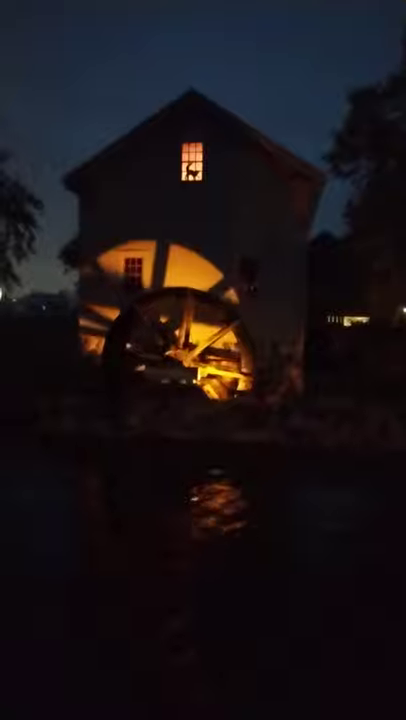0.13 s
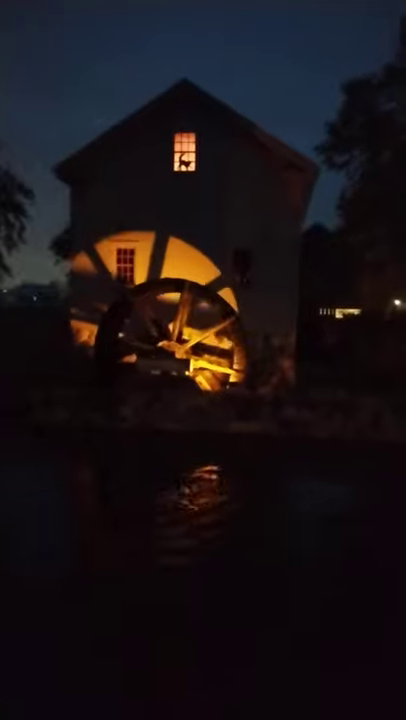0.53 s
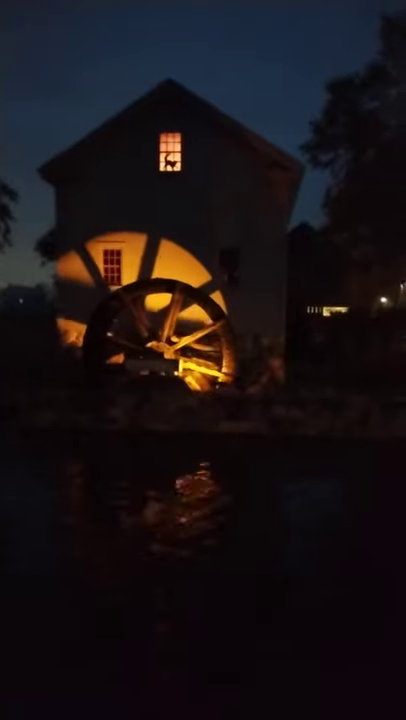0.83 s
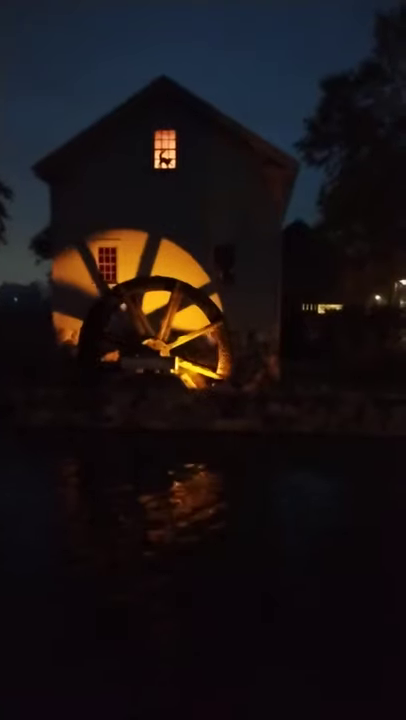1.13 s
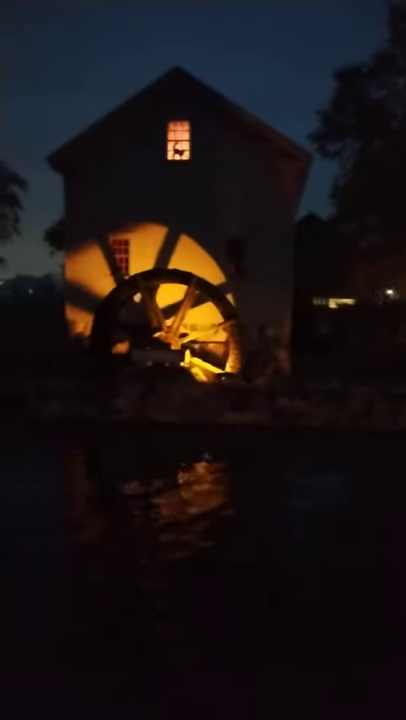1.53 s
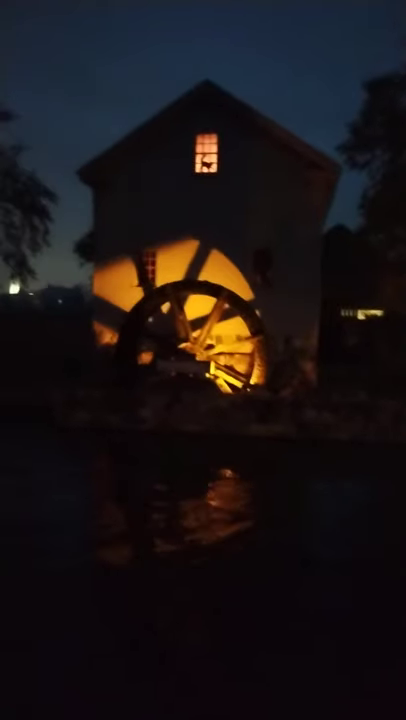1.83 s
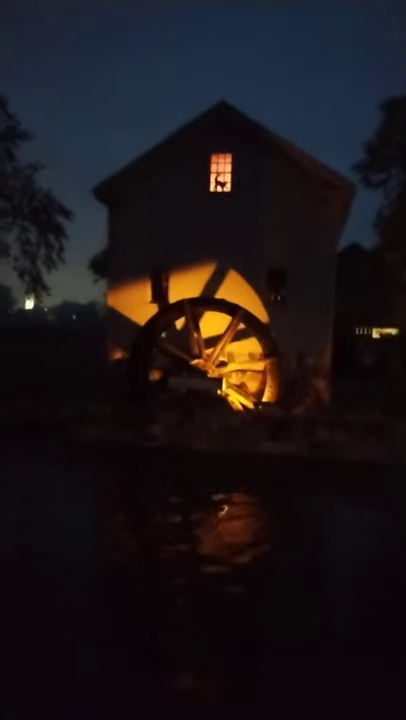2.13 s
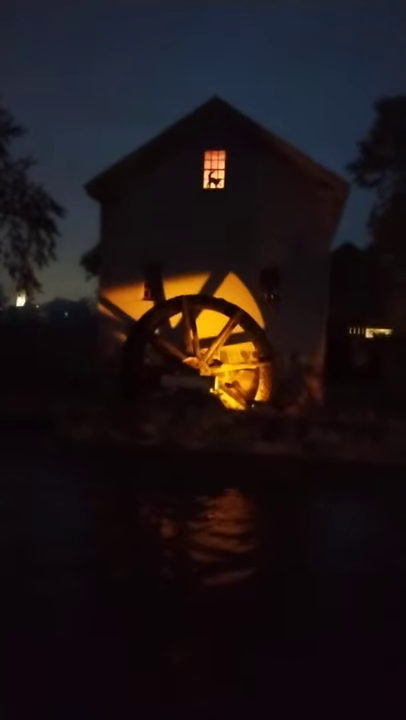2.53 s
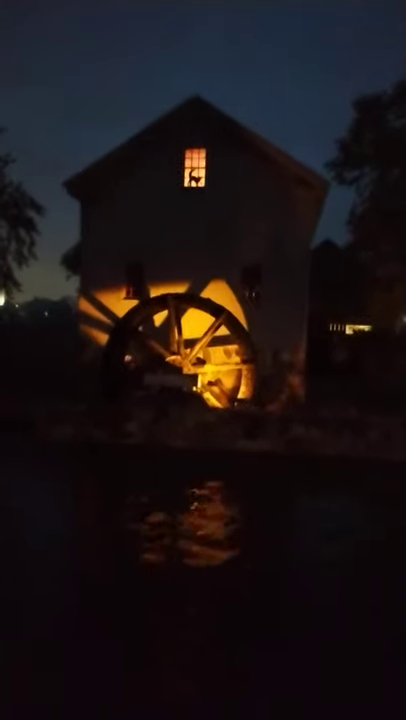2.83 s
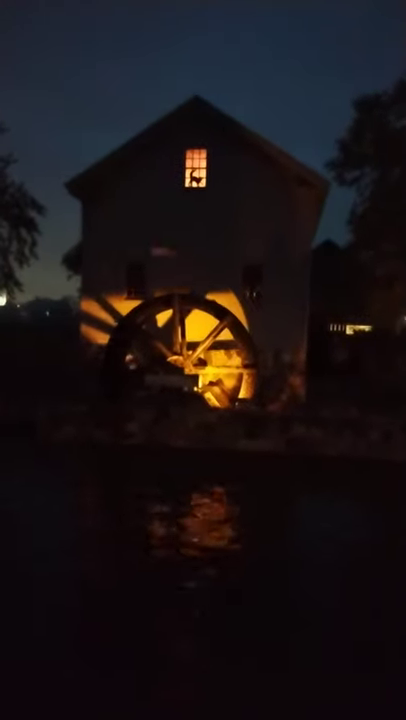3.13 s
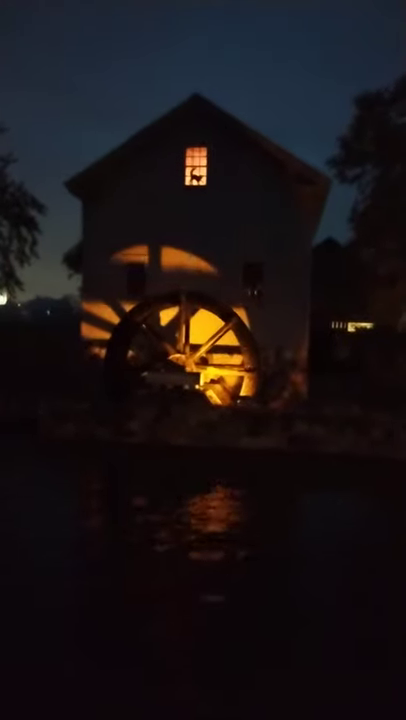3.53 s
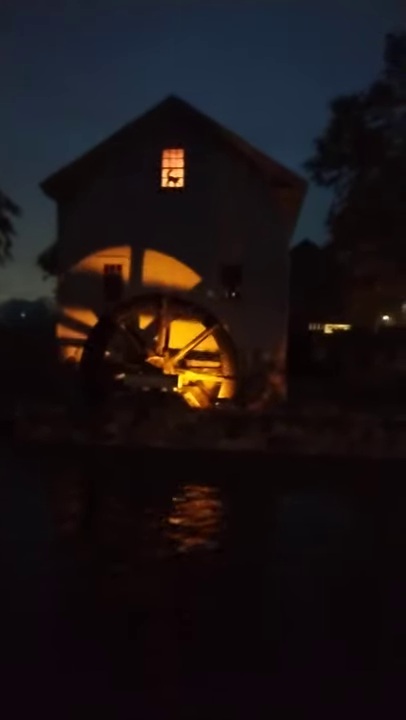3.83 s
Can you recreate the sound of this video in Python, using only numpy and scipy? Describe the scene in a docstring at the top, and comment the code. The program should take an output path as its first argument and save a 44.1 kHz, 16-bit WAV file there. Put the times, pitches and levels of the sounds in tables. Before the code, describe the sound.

A wide rush of falling water fades in quickly, churning and hissing over a mill wheel across a pond. It booms and thumps in the wheel pit, then grows softer and thinner, with one small splash.

```python
"""Across a mill pond at night: water pours over a wheel and a weir.
Churning water, crowds of small bubbles and spray make one broad rush. Falling water booms
in the wheel pit, heavy gushes thump in it, and one small splash stands out.
The sound fades in after a moment of silence; the rush grows softer and thinner half way through."""
import sys
import numpy as np
from scipy import signal
from scipy.fft import rfft, irfft
from scipy.io import wavfile
from scipy.ndimage import uniform_filter1d

SR = 44100
rng = np.random.default_rng(int(sys.argv[2]) if len(sys.argv) > 2 else 0)


def wrap_up_sound(samples):
    """Save the sound to the file named by the first command line argument, as 16-bit audio."""
    columns = np.atleast_2d(samples).T
    # keep every value between -1 and 1, then stretch to whole-number steps
    tamed = np.clip(columns, -1, 1)
    steps = np.round(tamed * 32767).astype(np.int16)
    wavfile.write(sys.argv[1], SR, steps)


N = 176400
TIME_S, FREQ_HZ = np.arange(N) / SR, np.fft.rfftfreq(N, 1 / SR)
START_S = 0.242


def undb(db):
    """Decibels to gain."""
    return 10 ** (np.asarray(db) / 20)


def unit(x):
    """Scale to rms 1."""
    return x / np.sqrt(np.mean(x ** 2))


def over_time(points):
    """Join (s, value) points by straight lines."""
    return np.interp(TIME_S, *np.array(points).T)


def over_pitch(points):
    """Join (Hz, value) points on a log-frequency axis."""
    hz, value = np.array(points).T
    return np.interp(np.log(FREQ_HZ + 1), np.log(hz + 1), value)


def wander(per_s):
    """Smooth random motion, rms 1."""
    hold = int(SR / per_s)
    steps = np.repeat(rng.standard_normal(N)[:N // hold + 1], hold)
    return unit(uniform_filter1d(uniform_filter1d(steps, hold), hold)[:N])


def resonant_noise(shape, hz, width_hz):
    """Noise around one peak, rms 1."""
    peak = 1 / (1 + ((FREQ_HZ - hz) / width_hz) ** 2) ** 2
    return unit(irfft(rfft(rng.standard_normal(shape)) * peak, N))


def drops(per_s=3000, spread_db=2, tail_s=0.0011):
    """Spray lands as dense ticks of uneven size, each with a short fizz."""
    lands = rng.random(N) < per_s / SR
    size_db = spread_db * np.minimum(rng.exponential(size=N), 2 * np.pi)
    ticks = lands * undb(size_db)
    fizz_power = signal.lfilter([1], [1, -np.exp(-2 / (tail_s * SR))], ticks ** 2)
    return unit(np.sqrt(fizz_power) * rng.standard_normal(N))


def bubbles(per_s=1100, low_hz=220.6, high_hz=3170, cycles=23, glide=0.1, spread_db=9.5):
    """Trapped air rings briefly, rising in pitch."""
    out = np.zeros(N + SR)
    for when, pitch, size in rng.random((int(per_s * N / SR), 3)):
        hz = low_hz + (high_hz - low_hz) * pitch ** 2
        age = np.linspace(0, 1, int(SR * cycles / hz))
        phase = 2 * np.pi * cycles * age * (1 + glide * age / 2)
        ring = np.sin(phase) * undb(-40 * age)
        onset = int(when * N)
        out[onset:onset + len(age)] += ring * np.sqrt(hz * pitch) * undb(spread_db * size ** 3)
    band_share = 2 * (high_hz - low_hz) / SR  # gives about the power per Hz of unit white noise
    return unit(out[:N]) * np.sqrt(band_share)


def water():
    """Spectrum of one stretch of falling water: churn, spray and bubbles."""
    churn = rng.standard_normal(N)
    return rfft(churn + undb(-5) * drops() + undb(-5) * bubbles())


# Likeness of left and right. Each row: frequency in Hz, coherence from 0 to 1.
COHERENCE = [(60, 0.991), (200, 0.979), (430, 0.926), (640, 0.704), (950, 0.762), (1400, 0.622),
             (1700, 0.619), (2100, 0.349), (3200, 0.524), (4300, 0.532), (6500, 0.351), (9000, 0.392),
             (11000, 0.291), (12800, 0.043), (15000, 0.044)]
# Balance. Each row: frequency in Hz, left over right in dB.
BALANCE_DB = [(60, 0.0), (200, 0.4), (400, 1.5), (600, 2.3), (850, -2.8), (1100, -0.9), (1400, 3.5),
              (1750, 1.3), (2400, -1.3), (3200, 2.8), (4400, 2.4), (5800, 7.0), (7000, 8.6), (8300, 12.4),
              (9600, 10.7), (11000, 4.6), (12000, 1.0), (14000, 4.5), (15500, 4.2)]
# Phase between the sides. Each row: frequency in Hz, lead of the left in radians.
LEAD_RAD = [(60, 0.11), (430, 0.28), (690, -0.08), (1210, 1.07), (1720, 0.3), (2400, 1.72), (3200, 2.55),
            (4400, 3.23), (6000, 3.59), (7300, 4.44), (9700, 4.35), (11500, 4.86), (14000, 2.53),
            (15500, 3.32)]


def wide_water():
    """Two stretches of water reach left and right; the bass is shared, the hiss leans left."""
    alike, lead_rad = over_pitch(COHERENCE), over_pitch(LEAD_RAD)
    lean = undb(over_pitch(BALANCE_DB) / 2)
    shared = water() * np.sqrt(1 + alike)
    apart = water() * np.sqrt(1 - alike)
    left = (shared + apart) * lean
    right = (shared - apart) / lean * np.exp(-1j * lead_rad)
    centre_gain = np.sqrt(lean ** 2 + lean ** -2 + 2 * alike * np.cos(lead_rad))
    return np.array([left, right]) / centre_gain


# Colour of the full and the soft rush. Each row: frequency in Hz, relative level within a band in dB.
FULL_COLOUR_DB = [(15, -57), (25, -40), (56, -9), (102, -1), (119, -1.5), (152, -3), (222, -5), (275, -8.5),
                  (402, -8), (602, -13.5), (788, -12), (951, -14.5), (1390, -15.5), (2950, -30),
                  (3380, -38), (3860, -35.5), (4190, -40), (5060, -38.5), (6280, -30.5), (8000, -24),
                  (8680, -24), (9660, -27), (11400, -42), (14100, -38.5), (15700, -41)]
SOFT_COLOUR_DB = [(15, -69), (25, -37), (30, -52), (42, -17), (86, -7.5), (123, -6), (137, -0.5),
                  (156, -11.5), (184, -3), (216, -10), (275, -9), (485, -15), (540, -14.5), (670, -15.5),
                  (1350, -19.5), (2020, -25), (2190, -29), (2650, -32.5), (3380, -38.5), (3970, -38),
                  (6630, -32), (8000, -24.5), (9160, -24.5), (12300, -37.5), (15700, -35)]
# Envelopes of the six bands, low to high. Each row: time in seconds, level before trim in dB.
BASS_DB = [(0.33, -45), (0.5, -38), (0.72, -38), (0.95, -36), (1.05, -37), (1.5, -37), (1.8, -35.5),
           (2.1, -36.5), (2.25, -41.5), (2.45, -42.5), (2.85, -43.5), (3.2, -43.5), (3.6, -46),
           (3.8, -41.5), (3.95, -45.5)]
MIDDLE_DB = [(0.33, -40), (0.45, -37), (0.8, -37.0), (1.2, -36.5), (1.6, -36), (2.0, -37), (2.3, -40),
             (2.6, -42), (2.9, -44.2), (3.4, -44.5), (3.8, -44.5), (3.95, -44)]
PRESENCE_DB = [(0.3, -64), (0.32, -63), (0.49, -59), (2.47, -67.5), (2.49, -66.5), (3.97, -67.5),
               (4.0, -67)]
LOW_HISS_DB = [(0.3, -60), (0.39, -55.5), (0.57, -53), (2.06, -55), (2.12, -60.5), (2.45, -59.5),
               (3.45, -65), (4.0, -66)]
HIGH_HISS_DB = [(.33, -49.5), (.45, -45), (.7, -46), (1.1, -46.5), (2.02, -47), (2.17, -49.5), (2.6, -50.5),
                (2.9, -52), (3.35, -53), (3.45, -57.5), (3.75, -57.5), (3.95, -60)]
AIR_DB = [(0.33, -56), (0.45, -52), (0.899, -57), (1.1, -58.7), (1.5, -59.0), (2.2, -61), (2.7, -59),
          (3.33, -60), (3.47, -64.3), (3.75, -65.0), (3.95, -67.2)]
# The bands, low to high: edges in Hz, trims in dB, offsets at the start of the fade-in in dB.
BAND_EDGES_HZ = [20, 250, 3300, 5500, 7200, 11000, 16000]
BAND_TRIM_DB = [-0.42, 0.039, 0.054, -0.18, -0.068, 0]
BAND_FADE_DB = [-7, -11, 0.5, -1, -9, -8]


def rush(fade_s=0.092, soften_at_s=2.3, soften_over_s=0.57, surge_db=0.34, flutter_db=0.5):
    """Water pours over weir and wheel: six bands that fade in, surge together and flutter alone."""
    flow = wide_water()
    spectra = [flow * undb(over_pitch(colour)) for colour in (FULL_COLOUR_DB, SOFT_COLOUR_DB)]
    soft = np.clip((TIME_S - soften_at_s) / soften_over_s + 0.5, 0, 1)
    fading = np.clip(1 - (TIME_S - START_S) / fade_s, 0, 1)
    common_db = surge_db * wander(per_s=8.9)
    out = 0
    for i, envelope in enumerate((BASS_DB, MIDDLE_DB, PRESENCE_DB, LOW_HISS_DB, HIGH_HISS_DB, AIR_DB)):
        level_db = over_time(envelope) + BAND_TRIM_DB[i] + BAND_FADE_DB[i] * fading
        gain = undb(level_db + common_db + flutter_db * wander(per_s=60))
        in_band = (FREQ_HZ >= BAND_EDGES_HZ[i]) & (FREQ_HZ < BAND_EDGES_HZ[i + 1])
        for spectrum, share in zip(spectra, (1 - soft, soft)):
            band = irfft(spectrum * in_band, N)
            centre_rms = band.mean(axis=0).std()
            out += band / centre_rms * share * gain
    return out


def pit_boom(below_bass_db=8.5):
    """Falling water keeps the wheel pit booming, following the bass of the rush."""
    return resonant_noise(N, hz=121.2, width_hz=13.7) * undb(over_time(BASS_DB) - below_bass_db)


# Gushes into the pit. Each row: start in seconds, pitch in Hz, envelope peak in dB.
GUSHES = [(.688, 117, -29.5), (1.975, 118, -32.5), (2.328, 163, -30.5), (2.423, 200, -34),
          (2.705, 118, -35)]


def gushes(rise_s=0.0066):
    """Heavy gushes plunge into the pit, each a low thump."""
    out = np.zeros(N)
    for start_s, hz, peak_db in GUSHES:
        age_s = np.maximum(TIME_S - start_s, 0)
        envelope = age_s / rise_s * np.exp(1 - age_s / rise_s)
        out += undb(peak_db) * envelope * np.sin(2 * np.pi * hz * age_s)
    return out


def splash(peak_s=2.658, half_width_s=0.018, slap_db=-48.5, spray_db=-54, spray_above_hz=5500):
    """One small slap of water stands out of the rush, with a trace of spray."""
    slap = resonant_noise((2, N), hz=1960, width_hz=400)
    spray = unit(irfft(rfft(rng.standard_normal((2, N))) * (FREQ_HZ > spray_above_hz), N))
    envelope = np.exp(-((TIME_S - peak_s) / half_width_s) ** 2)
    return (slap * undb(slap_db) + spray * undb(spray_db)) * envelope


def scene():
    """The wide rush, the pit's boom and thumps in its centre, and a small splash."""
    return rush() + pit_boom() + gushes() + splash()


def record(dry):
    """The sound switches on and loses its very top."""
    top_hz = 15800
    lowpass = signal.ellip(12, 0.1, 80, top_hz, fs=SR, output="sos")
    return signal.sosfilt(lowpass, dry * (TIME_S > START_S))


dry = scene()
out = record(dry)
wrap_up_sound(out)
```